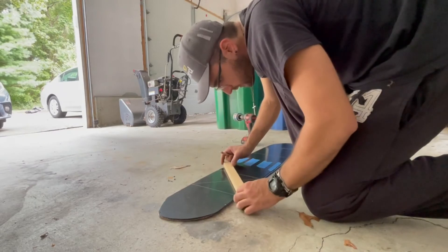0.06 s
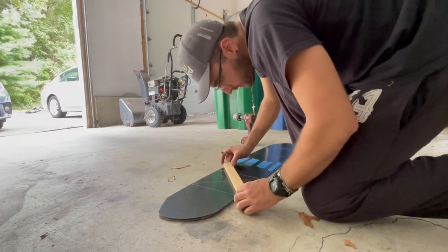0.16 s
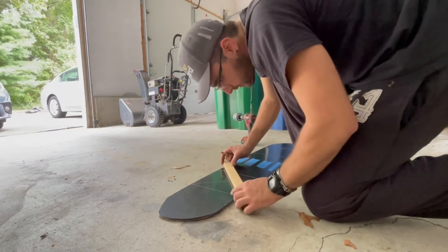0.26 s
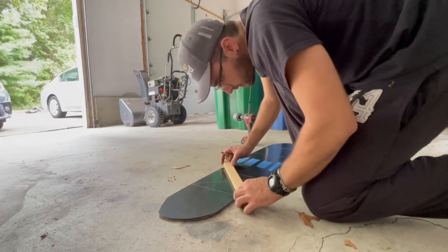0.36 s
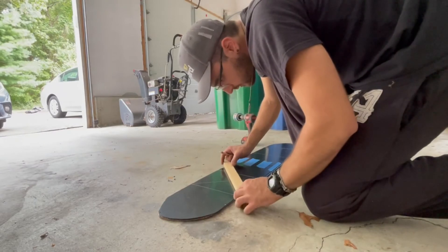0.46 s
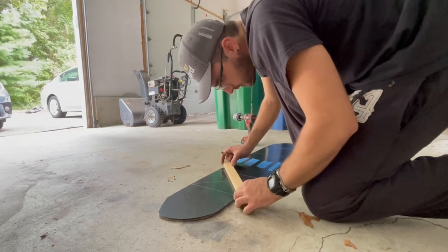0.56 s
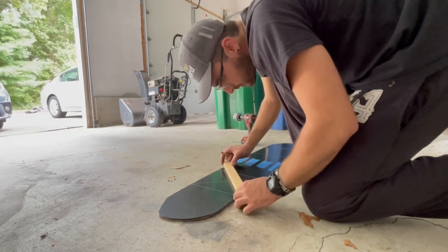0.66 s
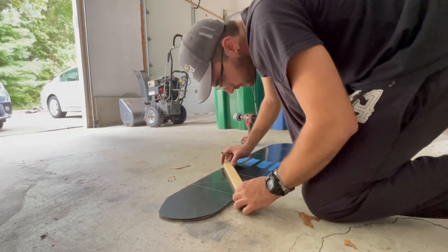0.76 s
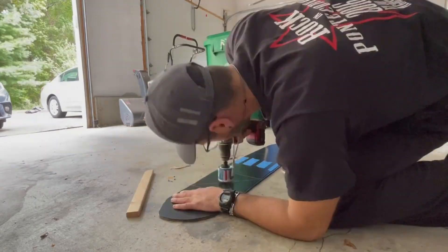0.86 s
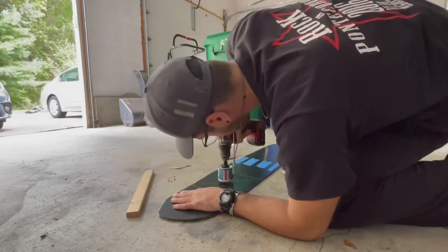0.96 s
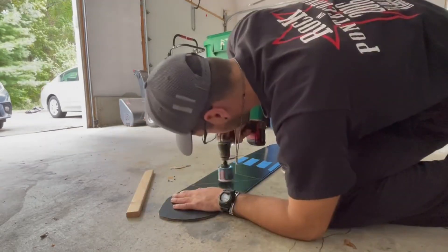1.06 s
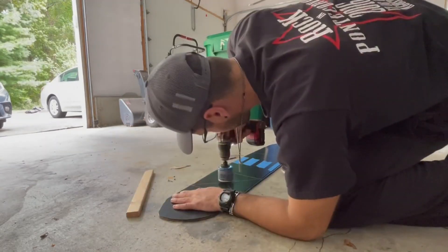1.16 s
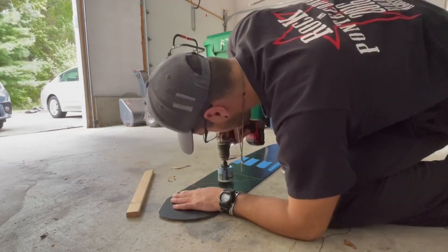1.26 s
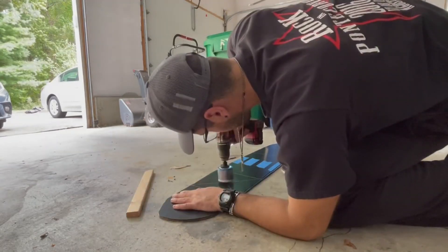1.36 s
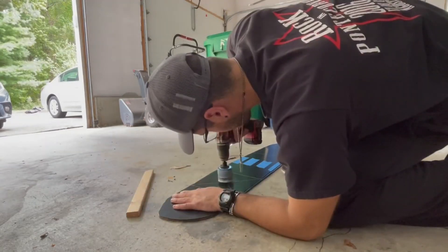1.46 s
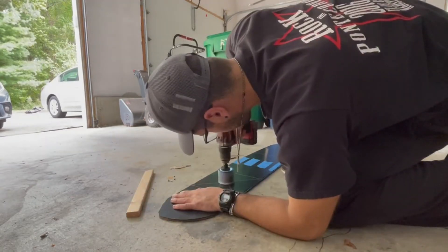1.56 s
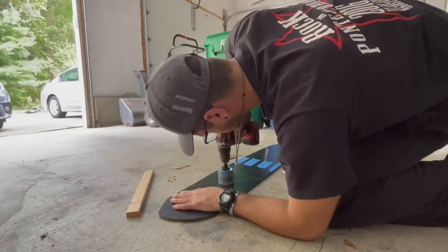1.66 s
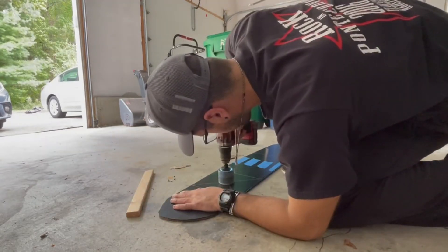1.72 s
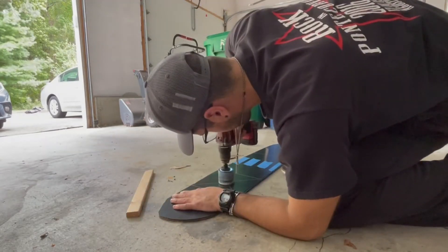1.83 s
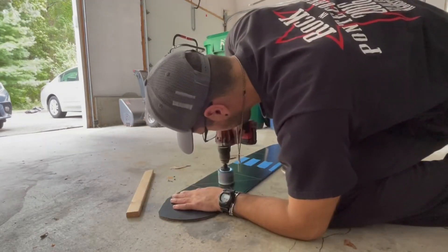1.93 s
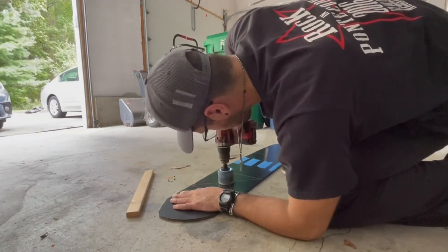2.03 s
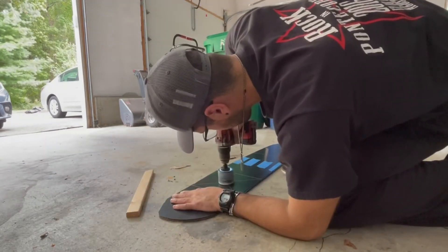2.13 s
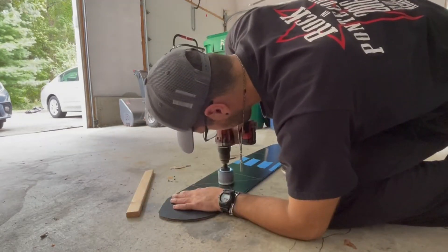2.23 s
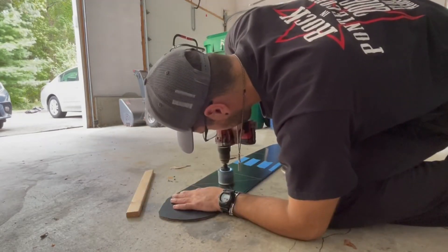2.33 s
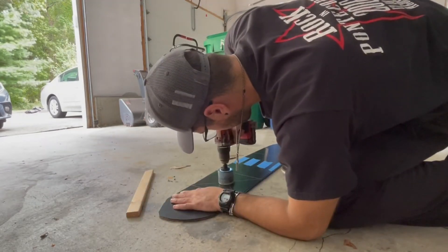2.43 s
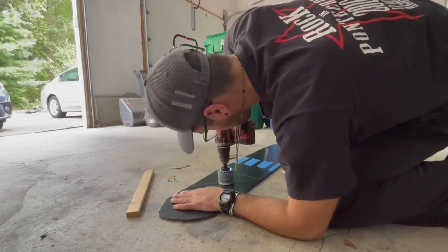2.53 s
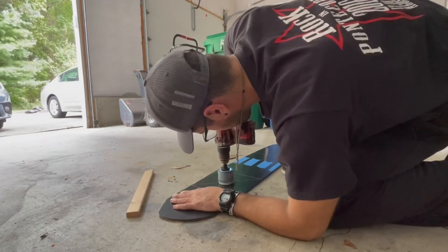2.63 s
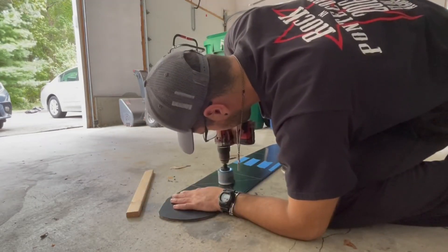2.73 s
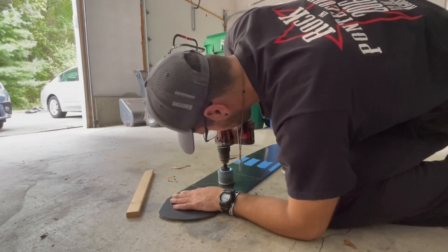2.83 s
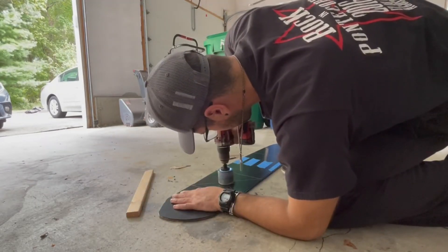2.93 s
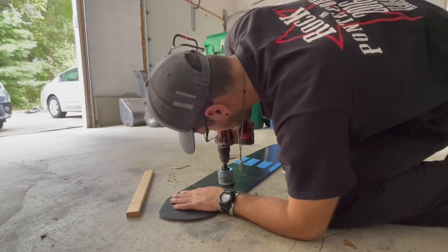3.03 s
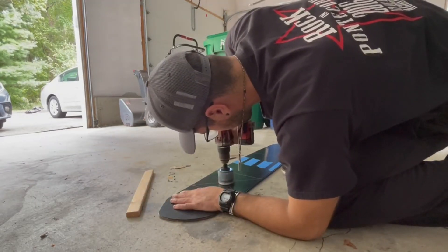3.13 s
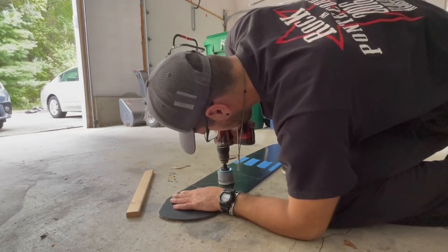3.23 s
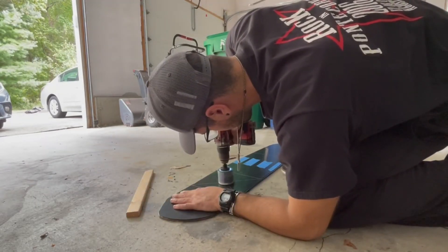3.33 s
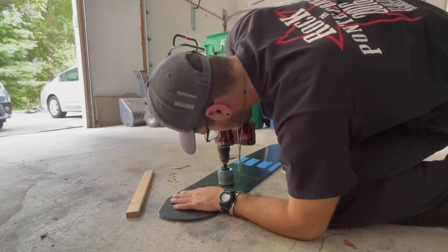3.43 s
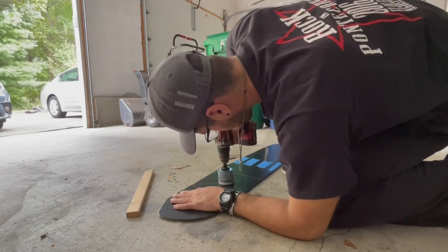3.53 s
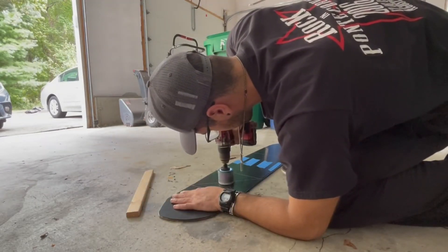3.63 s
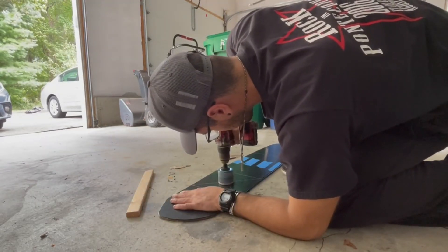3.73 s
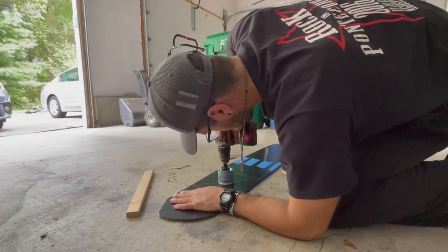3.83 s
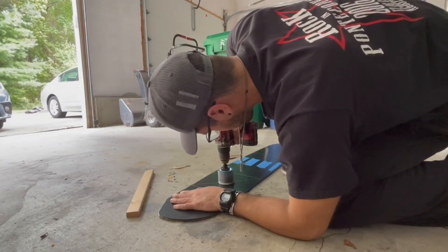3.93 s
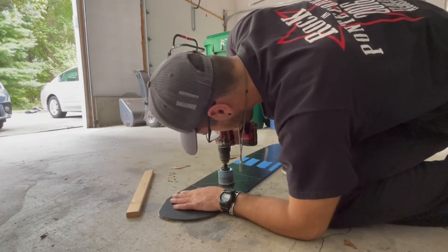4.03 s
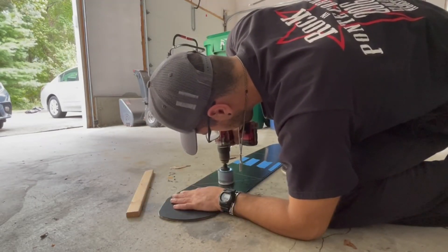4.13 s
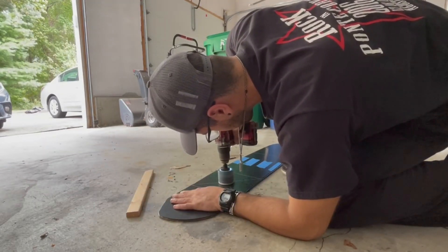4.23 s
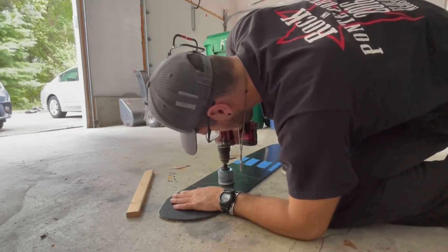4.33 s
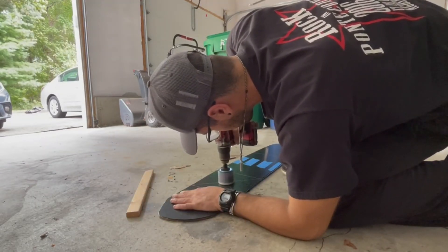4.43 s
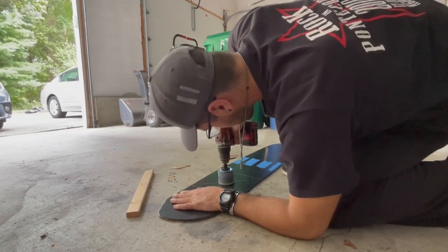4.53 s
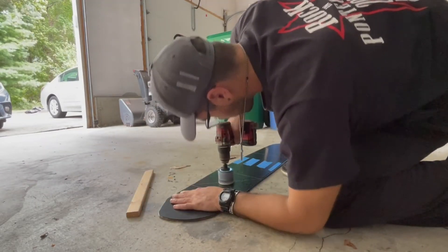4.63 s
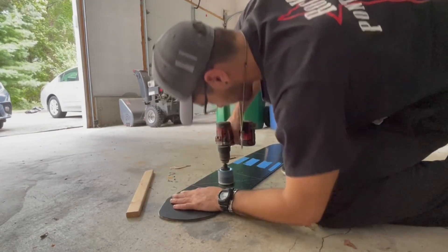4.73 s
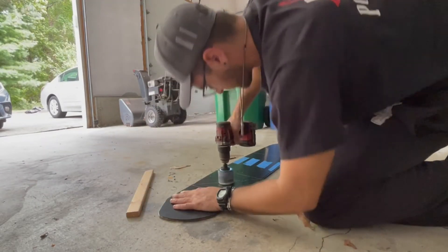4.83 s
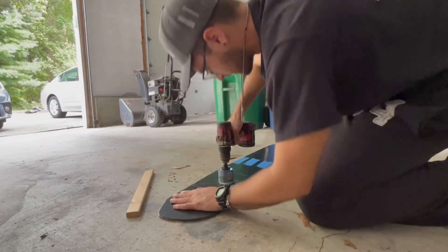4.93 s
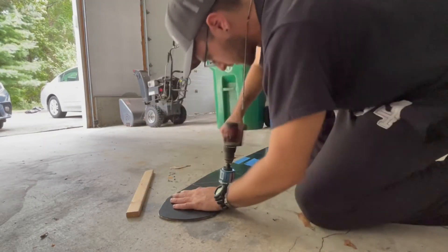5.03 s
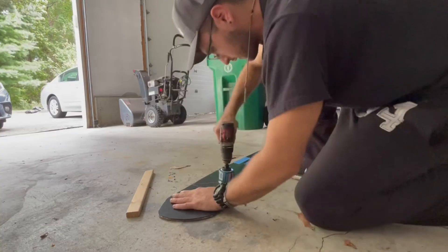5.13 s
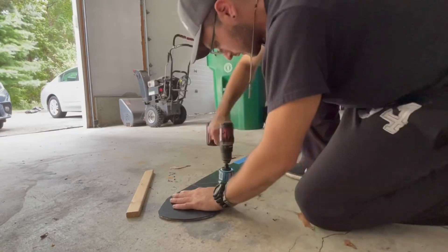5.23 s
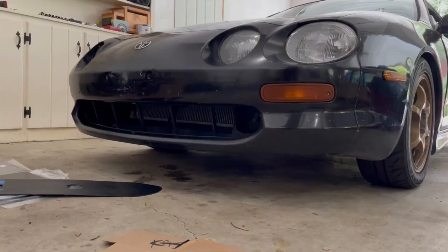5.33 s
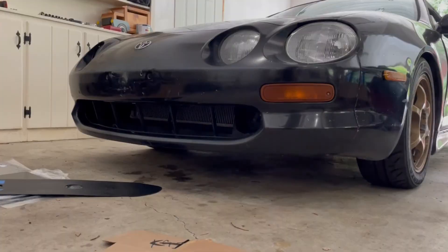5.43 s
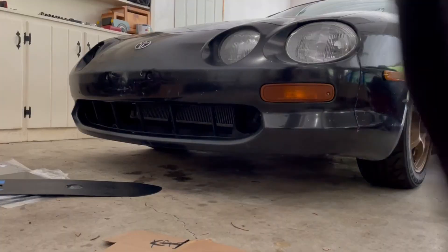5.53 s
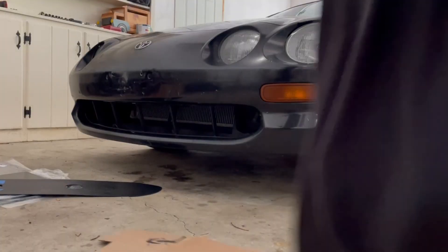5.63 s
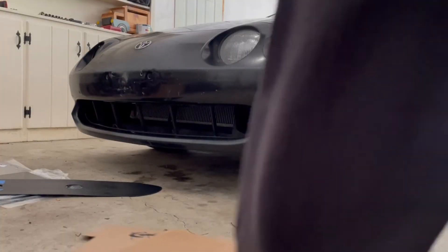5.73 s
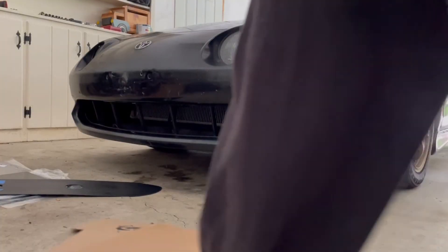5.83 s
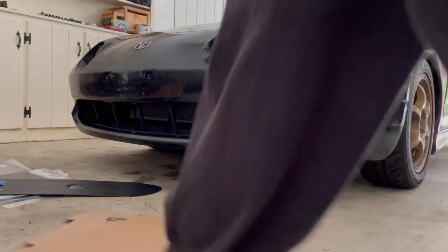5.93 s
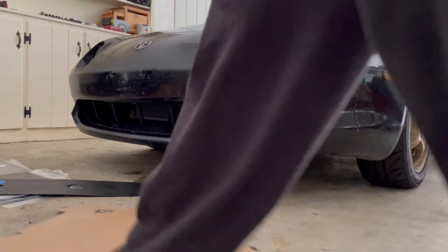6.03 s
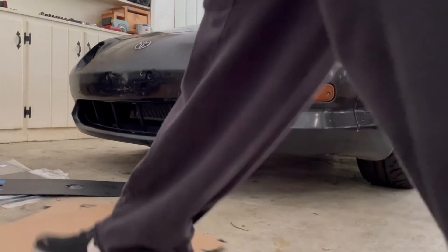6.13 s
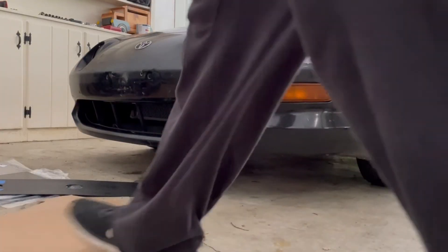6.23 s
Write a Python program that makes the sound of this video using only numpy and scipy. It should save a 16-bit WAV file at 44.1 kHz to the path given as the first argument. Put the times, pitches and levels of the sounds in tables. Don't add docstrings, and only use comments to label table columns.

```python
import sys
import numpy as np
from scipy import signal
from scipy.fft import rfft, irfft, next_fast_len
from scipy.io import wavfile
from scipy.ndimage import uniform_filter1d, map_coordinates

SR = 44100
rng = np.random.default_rng(int(sys.argv[2]) if len(sys.argv) > 2 else 0)


def bounce(signal):
    frames = np.transpose(np.atleast_2d(signal))
    limited = np.clip(frames, -1, 1)
    pcm = np.round(limited * 32767).astype(np.int16)
    wavfile.write(sys.argv[1], SR, pcm)


def gain_from_db(level_db):
    decades = np.asarray(level_db, float) / 20
    return 10 ** decades


N = 276418
SCENE_CHANGES_S, SPIN_UP_ENDS_S, STOPPED_S = 5.343, 1.5, 4.995
SWITCH_HZ = 7772

# t/s, level/dB
RUMBLE_LEVEL = [(0, -61), (.72, -60.5), (.76, -66), (.85, -55.5), (.926, -73), (.95, -64), (5.34, -56.5),
                (5.36, -69), (5.51, -70)]
# t/s, level/dB
ENGINE_LEVEL = [(0, -56), (.15, -58), (.55, -55.5), (.62, -71), (.8, -61), (.88, -58), (.9, -93)]
# f/Hz, level/dB per Hz
HISS_DRILL = [(150, -11), (250, -9.5), (370, -11), (800, -12), (1400, -19.5), (4800, -22.5), (6000, -17),
              (8000, -27.5), (10800, -34), (13500, -36), (15500, -43)]
HISS_CORNER = [(150, -10), (250, -2), (1000, -2.5), (2200, -11), (2330, 1), (2440, -10), (2950, -4),
               (3100, -3), (3300, -8), (4940, -15), (6280, -4), (9000, -50), (11000, -28), (15500, -32)]
RUMBLE_COLOUR = [(15, -59), (25, -49), (45, -5), (135, -8), (199, -17.5), (330, -18.5), (430, -48),
                 (730, -120)]
# t/s, commutation f/Hz
SPEED = [(0.955, 25), (1.08, 95), (1.15, 200), (1.3, 262), (1.415, 405), (1.452, 520), (1.506, 1026),
         (1.55, 1034), (1.63, 1120), (2.75, 940), (3.2, 938), (3.5, 1022), (4.283, 1102), (4.68, 1092),
         (4.861, 1062), (4.92, 880), (4.988, 520), (5.01, 90), (5.2, 45)]
# t/s, drop/Hz, fall/s, recovery/s
CATCHES = [(1.574, 148, .012, .04), (1.71, 90, .065, .045), (1.815, 80, .035, .09), (1.945, 98, .03, .07),
           (2.09, 72, .065, .05), (2.19, 56, .035, .045), (2.33, 64, .04, .06), (2.42, 44, .02, .12),
           (2.5, 36, .06, .045), (2.58, 98, .025, .05), (2.655, 36, .02, .05), (2.75, 46, .04, .04),
           (2.83, 52, .025, .14), (2.985, 62, .03, .06), (3.115, 66, .055, .08), (3.24, 58, .06, .075),
           (3.43, 34, .1, .06), (4.885, 30, .015, .06)]
# t/s, share/0-1
LOAD = [
    (1.4, .3),
    (1.6, 1),
    (3.3, 1),
    (3.55, .15),
    (4.6, .15),
    (4.9, .6),
]
# t/s, level/dB
EFFORT = [(.95, -63), (.99, -47.5), (1.06, -63), (1.1, -47.5), (1.25, -45), (1.31, -41.5), (1.4, -39.5),
          (1.43, -33.5), (1.53, -27), (4.61, -27.5), (4.66, -25.5), (4.85, -25.5), (4.96, -31), (5.01, -38),
          (5.14, -49), (5.21, -46), (5.26, -54), (5.33, -53)]
# f/Hz, level/dB per Hz
GEARBOX = [(1410, -26), (2400, -6), (3150, -8.5), (4140, -3), (4550, -4), (6030, -3), (6620, -5.5),
           (7740, -3.5), (9260, -16.5), (10700, -9), (13200, -17), (14200, -12), (15600, -23)]
# f/Hz, width/Hz, level/dB
CASING = [(2350, 300, -11), (3450, 340, -1), (3800, 300, -1), (4250, 500, -3.5)]
# t/s, level/dB over the motor
PRESS = [(1.1, -4), (1.5, -8.5), (1.53, 3), (1.58, -1.5), (1.63, -2.5), (3.4, 2.5), (4.97, 3.5),
         (5.01, -29), (5.14, -5)]
# f/Hz, width/Hz, level/dB
PANEL = [(950, 260, 0), (1300, 250, -6)]
PANEL_LOW = [(514, 95, -3), (656, 69, 3), (765, 84, 0)]
# t/s, level/dB
LOOSE = [(1.5, -9), (2.4, -8.5), (3.1, -6.5), (3.4, -6), (4, -6.5), (4.61, -6), (4.68, -1), (5, 1)]
# f/Hz, width/Hz, level/dB
GROOVE = [
    [(925, 70, 0)],
    [(860, 80, 0)],
]
# t/s, high song level/dB, low song level/dB
SONGS = [(3.05, -25, -25), (3.2, -1.5, -9), (3.45, -4, -15), (3.55, -11, -5.5), (3.72, -5, -4),
         (3.85, -21, -11), (4.05, -13, -8), (4.15, -9, -4.5), (4.3, -7, -9), (4.4, -12, -18),
         (4.48, -10, -14), (4.6, -26, -29)]
# f/Hz, width/Hz, level/dB
TEETH = [(1565, 403, -1), (2097, 256, 6.5), (2800, 720, -4)]
CUP = [(2150, 170, 0)]
# f/Hz, level/dB per Hz
THRUM = [(18, -52), (30, -20), (150, -0.5), (194, -5.5), (226, -1.5), (258, -3.5), (420, -4), (550, -6.5),
         (920, -120)]
# t/s, level/dB
LEAN = [(1.5, -5), (1.9, -1), (2.2, -2.5), (2.45, 2), (3.1, -0.5), (3.45, 5), (3.8, 2), (4.9, 0),
        (5.1, -0.5), (5.2, -8)]
# t/s, gear whine level/dB, switching whistle level/dB
SING = [(.955, -72, -63), (1, -75, -53.5), (1.08, -61, -60), (1.11, -66, -51), (1.33, -61, -48),
        (1.43, -30.5, -63), (1.485, -34.5, -63), (1.58, -34.5, -53), (2.1, -33, -44.5), (2.75, -35.5, -54),
        (3.12, -33.5, -56), (3.2, -37, -54), (3.42, -36.5, -46), (3.52, -32.5, -72), (4.1, -42.5, -45),
        (4.84, -36, -58), (4.93, -42, -56), (5.22, -53, -49), (5.29, -62, -68.5)]
# f/Hz, level/dB
RADIATES = [(3000, -18), (3250, 0), (4500, 0), (4900, -14), (6900, -14), (7200, -2), (7900, 0), (8400, -7)]
# t/s, peak level/dB, f/Hz, t60/s
KNOCKS = [(.972, -39, 3600, 0.013), (.985, -34, 3360, 0.007), (1.098, -33, 3606, 0.011),
          (3.35, -19, 3490, .03), (3.435, -15, 3500, 0.022), (3.515, -17, 3470, .02),
          (3.595, -19, 3480, 0.019), (4.992, -8.5, 2600, 0.0047), (5.016, -27, 3350, .025),
          (5.038, -28, 3400, .025), (5.062, -29, 3460, .04), (5.09, -35, 3420, .03),
          (5.187, -26, 3500, .012), (5.2, -23, 3400, 0.014), (5.228, -30, 3430, 0.013),
          (5.289, -23, 1830, 0.015), (5.2905, -17.5, 766, 0.0073), (5.321, -31.5, 900, 0.014),
          (5.5675, -17.5, 1140, 0.014), (5.569, -13, 416, 0.01), (5.576, -33, 5000, .004),
          (5.6, -12, 3680, 0.011), (6.166, -24, 12500, .012), (6.17, -33, 10500, .012),
          (6.188, -27, 152, 0.1), (6.222, -31.5, 155, .5), (6.13, -31, 245, 0.28), (1.532, -41, 72.4, 0.35)]
# t/s, peak level/dB, f/Hz, t60/s
BITE = [(1.5325, -12, 1010, 0.0069), (1.533, -5.5, 2600, .002), (1.604, -22, 1210, 0.036),
        (1.81, -22, 1060, 0.027), (1.885, -25, 930, 0.044), (1.88, -19, 1080, 0.027),
        (2.032, -18.5, 1056, 0.025), (2.31, -22.5, 950, .04), (2.42, -20.5, 1110, 0.034),
        (2.455, -24, 975, .04), (2.805, -22.5, 1010, .03)]
# t/s, peak level/dB, f/Hz, t60/s
POPS = [(5.6178, -11, 2000, .003), (5.6295, 0.5, 1500, 0.0049), (5.6335, -3, 3620, 0.0036),
        (5.645, -5, 2800, 0.0054), (5.653, -9, 3500, 0.0033), (5.6578, -3, 3300, .004),
        (5.71, -10, 3000, .003), (5.756, -11, 1300, 0.0037), (5.85, -12, 2500, .004),
        (6.1955, -21, 3400, .005)]
# t/s, level/dB
SHAKE = [(1.5, -86), (2.1, -52), (2.6, -63), (3.45, -47.5), (3.75, -50), (3.9, -40.5), (4.5, -44),
         (4.85, -50.5), (5, -59)]
# order/multiples of the chuck's turn, level/dB
SHAKE_ORDERS = [(2, -17), (3, -24), (4, -3.5), (5, -16), (6, 1.5), (7, -11.5), (8, -3.5), (9, -18),
                (12.5, -6), (19.5, -6)]
# t/s, f/Hz, level/dB
GROAN = [
    (1.95, 155, -50),
    (2.04, 151, -40),
    (2.15, 102.8, -47),
    (2.29, 91.7, -44.5),
    (2.38, 60, -53),
    (2.5, 42, -66),
]
# t/s, level/dB
DRAG = [(5.566, -36.5), (5.588, -36.5), (5.602, -27), (5.65, -27.5), (5.82, -26), (5.855, -23.5),
        (5.89, -24.5), (6.01, -23.5), (6.092, -25), (6.108, -29.5), (6.125, -38), (6.145, -30.5),
        (6.268, -37.5)]
# f/Hz, level/dB per Hz
GRIT = [(700, -15), (1300, 0), (2700, 0.5), (3600, 1), (6000, -3), (8300, -4), (10500, -7), (13000, -12.5),
        (15100, -7), (15500, -25)]
# f/Hz, width/Hz, level/dB
CRUSH = [(2710, 290, 8), (4230, 1600, -15)]
SHEET = [(155, 95, -10.5), (266.6, 45, 4.5), (309, 38, 5), (474, 117, 0), (766, 260, -2.5), (1390, 390, -7)]
# f/Hz, t60/s
GARAGE = [(100, 0.29), (1000, 0.74), (5000, 0.7), (12000, 0.054)]
# f/Hz, phase/rad
LEAD_DRILL = [(0, 0), (340, .4), (2500, 1), (4400, .6), (5300, 1.5), (6000, 3.1), (6500, 5.8), (7900, 6.5),
              (8650, 9.3), (10100, 6.7), (11000, 6.3), (12400, 6), (13200, 4.7), (14100, 3.3),
              (14500, 3.14)]
LEAD_SHEET = [(0, 0), (430, .5), (3000, .5), (4400, 0), (5900, -.2), (6600, -.7), (7700, -3.14),
              (8900, -3.14), (10500, -6.28), (12900, -6.28), (13800, -9.42), (14200, -10.4), (15100, -10.4),
              (15400, -9.42)]
# f/Hz, level/dB
TILT_DRILL = [(60, -2), (110, 1), (200, -0.5), (380, 2.5), (700, 0.5), (1290, 1.1), (2380, 1.3), (4400, 2),
              (8120, -3), (12000, -3.5), (15000, -.5)]
TILT_SHEET = [(60, -5), (110, 3), (200, 1), (380, 1), (700, 5.5), (1290, 3), (2380, 4), (4400, 4.5),
              (8120, 3.5), (15000, -6)]
# f/Hz, level/dB
WET_DRILL = [(60, -30), (150, -7), (400, -3), (3000, -1.5), (6500, -3.5), (7600, -5), (9000, 7.5),
             (10500, -2), (11500, -28)]
WET_SHEET = [(100, -8), (400, -8), (1700, -2.5), (6500, -8.5), (7600, -27), (8800, -6), (9600, -21),
             (10700, -19), (13000, -16), (14500, -13)]


def unit(x):
    return x / np.sqrt(np.mean(x ** 2) + 1e-20)


def along(points, hz):
    f, v = np.transpose(points)
    return np.interp(np.log(hz + 1), np.log(f + 1), v)


def curves(rows):
    s, *cols = np.transpose(rows)
    return [np.interp(np.arange(N) / SR, s, c) for c in cols]


def span(t0, t1):
    return (np.arange(N) >= t0 * SR) & (np.arange(N) < t1 * SR)


def wobble(rate):
    knots = rng.standard_normal(int(N * rate / SR) + 4)
    return map_coordinates(knots, [np.arange(N) * rate / SR])


def filtered(x, response):
    m = next_fast_len(N + SR // 2)
    return irfft(rfft(x, m) * response(np.fft.rfftfreq(m, 1 / SR)), m)[..., :N]


def coloured(x, spectrum):
    return unit(filtered(x, lambda hz: gain_from_db(along(spectrum, hz))))


def resonant(x, modes):
    def body(f):
        total = 0
        for k, (centre, width, db) in enumerate(modes):
            damping = 1.5j * f * width
            total = total + (-1) ** k * gain_from_db(db / 2) * damping / (centre ** 2 - f ** 2 + damping)
        return total
    return unit(filtered(x, lambda f: body(f) ** 2))


def gritty(rough_db, rate):
    return rng.standard_normal(N) * gain_from_db(rough_db * wobble(rate))


def tone(hz, start=None):
    if start is None:
        start = rng.uniform(0, 2 * np.pi)
    return np.sqrt(2) * np.sin(2 * np.pi * np.cumsum(hz * np.ones(N)) / SR + start)


def struck(events):
    out, t = np.zeros(N + SR), np.arange(SR // 6) / SR
    for s, db, hz, t60 in events:
        crack = 0.42 * gain_from_db(-60 * t / 0.0039) * uniform_filter1d(rng.standard_normal(len(t)), size=3)
        ring = gain_from_db(-60 * t / t60) * np.sin(2 * np.pi * hz * t) * (1 - np.exp(-t / 0.00056))
        out[round(s * SR):][:len(t)] += gain_from_db(db) * (ring + crack)
    return out[:N]


def air():
    def two_ports(mix, colour):
        return np.array(mix) @ [coloured(rng.standard_normal(N), colour) for _ in range(2)]

    first = span(0, SCENE_CHANGES_S)
    hiss_mix = [[1.28, 0.8], [0.48, -0.98]]
    hiss = np.where(first, two_ports(hiss_mix, HISS_DRILL), two_ports(hiss_mix, HISS_CORNER))
    hiss = hiss * gain_from_db(np.where(first, -58.5, -64.5) + wobble(11))
    rumble_db = curves(RUMBLE_LEVEL)[0] + 3.5 + 1.4 * wobble(12.0)
    rumble = gain_from_db(rumble_db) * two_ports([[1.0, 0.22], [1.0, -0.3]], RUMBLE_COLOUR)
    orders = [(2, -10), (4, -6), (5, 0), (6, -10)]  # (multiple of the 28.3 Hz idle, dB)
    engine = sum(gain_from_db(db + wobble(8)) * tone(k * 28.3) for k, db in orders)
    return hiss + rumble + gain_from_db(curves(ENGINE_LEVEL)[0]) * engine


def gear_speed():
    t = np.arange(N) / SR
    dips = sum(drop * np.interp(t, [s - fall, s, s + back], [0, 1, 0]) for s, drop, fall, back in CATCHES)
    return curves(SPEED)[0] - dips


def gears(bite):
    fast = np.clip(gear_speed() / 800, 0, 1)
    level_db = curves(EFFORT)[0] - 7.5 + 5.3 * fast + 0.085 * bite + 0.65 * wobble(29.79)
    return gain_from_db(level_db) * coloured(gritty(1.5, 900), GEARBOX)


def casing():
    speed = gear_speed()
    kicks = unit(np.diff(np.floor(np.cumsum(speed / SR)), prepend=0))
    level_db = curves(EFFORT)[0] - 3.5 - 10.8 * np.clip(speed / 800, 0, 1) + wobble(60)
    return gain_from_db(level_db) * resonant(0.4 * kicks + gritty(2.2, 300), CASING)


def panel(bite):
    ring = gain_from_db(0.8 * wobble(45)) * resonant(gritty(2, 250), PANEL)
    ring += gain_from_db(curves(LOOSE)[0]) * resonant(gritty(3.0, 200), PANEL_LOW)
    for song_db, mode in zip(curves(SONGS), GROOVE):
        ring += gain_from_db(song_db + 1.5 * wobble(25)) * resonant(gritty(2.5, 200), mode)
    return ring * gain_from_db(curves(EFFORT)[0] + curves(PRESS)[0] - 8 + 0.5 * bite + 0.6 * wobble(25.47))


def teeth(bite):
    effort_db = curves(EFFORT)[0]
    freed_db = 0.16 * (curves(LOOSE)[0] + 9.5)
    scrape_db = effort_db + curves(PRESS)[0] - 8.5 + freed_db + 0.5 * bite
    scrape = gain_from_db(scrape_db) * resonant(gritty(3.0, 500), TEETH)
    since = np.arange(N) / SR - 1.3
    hum_db = effort_db - 12.5 - 9 * since
    return scrape + gain_from_db(hum_db) * (since > 0) * resonant(gritty(3, 150), CUP)


def floor_thrum():
    pressed_db = np.where(span(0, STOPPED_S), 0.78 * curves(PRESS)[0], 10)
    level_db = curves(EFFORT)[0] + pressed_db - 18.5 + curves(LEAN)[0]
    level_db = level_db + 3.5 * curves(LOAD)[0] + 1.55 * wobble(8.8)
    return gain_from_db(level_db) * coloured(rng.standard_normal(N), THRUM)


def saw():
    bite = wobble(12)
    return (gears(bite) + casing() + panel(bite) + teeth(bite) + floor_thrum()) * span(0.88, 6.5)


def rotor_speed():
    speed = uniform_filter1d(gear_speed(), size=220)
    steady = uniform_filter1d(speed, size=8000)
    loaded = np.clip((np.arange(N) / SR - SPIN_UP_ENDS_S) / 0.12, 0, 1) * curves(LOAD)[0]
    return 0.99 * (speed + loaded * (steady - speed)), steady, loaded


def gear_whine():
    whine_db, load = curves(SING)[0], curves(LOAD)[0]
    speed = uniform_filter1d(gear_speed(), size=220)
    _, steady, loaded = rotor_speed()
    rising = span(0, SPIN_UP_ENDS_S)
    jerk = 1 + 0.004 * load * wobble(80)

    def beads():
        return gain_from_db((2 + 1.4 * load) * wobble(90))

    whine = np.zeros(N)
    for k, db, flutter in [(4, 0, 0.006), (8.17, -2, 0.009)]:  # (order, dB, pitch flutter share)
        level_db = whine_db + db + along(RADIATES, k * speed) - (k - 4) * 1.6 * rising
        whine += gain_from_db(level_db) * beads() * tone(k * speed * jerk * (1 + flutter * wobble(150)))
    for k, db in [(5, -19), (6, -16), (7, -16)]:
        whine += gain_from_db(whine_db + db + along(RADIATES, k * speed)) * rising * beads() * tone(k * speed)
    side_db = whine_db - 13 + along(RADIATES, 4 * speed)
    for share in (0.945, 1.055):
        whine += gain_from_db(side_db) * load * beads() * tone(4 * speed * (share + 0.008 * wobble(60)))
    blurred = beads() * tone(2.05 * steady * (1 + 0.04 * wobble(500)))
    return whine + gain_from_db(whine_db - 5) * loaded * np.clip((steady - 880) / 170, 0, 1) * blurred


def switching_whistle():
    rotor = rotor_speed()[0]
    speed = uniform_filter1d(gear_speed(), size=220)
    slow_db = -14 * np.clip(speed / 600, 0, 1)

    def pair(order):
        return tone(SWITCH_HZ + order * rotor, start=0) + tone(SWITCH_HZ - order * rotor)

    whistle = pair(1)
    upper = 0.48 * np.clip(speed / 900, 0, 1)
    whistle = whistle + upper * tone(SWITCH_HZ + rotor, start=0)
    braking = 7 * span(4.89, STOPPED_S)
    whistle = whistle + braking * tone(SWITCH_HZ + rotor, start=0)
    whistle = whistle + gain_from_db(slow_db) * (gain_from_db(1) * tone(SWITCH_HZ) + gain_from_db(-4) * pair(2))
    octave = tone(2 * SWITCH_HZ + rotor) + 0.64 * tone(2 * SWITCH_HZ)
    whistle = whistle + gain_from_db(-8.0 + 1.87 * slow_db - 40 * span(1.32, 5.6)) * octave
    whistle = whistle + gain_from_db(-7 - 30 * span(5.25, 6)) * tone(2 * SWITCH_HZ - rotor)
    level_db = curves(SING)[1] + 1.5 * wobble(9) + wobble(30)
    return gain_from_db(level_db) * span(0.958, SCENE_CHANGES_S) * whistle


def knocks():
    return struck(KNOCKS + BITE + POPS)


def chuck_turn_hz():
    return uniform_filter1d(gear_speed(), size=9000) / 39.1


def chuck_shake():
    turn_hz = chuck_turn_hz()
    shake = sum(gain_from_db(db + 0.24 * wobble(2.4)) * tone(k * turn_hz) for k, db in SHAKE_ORDERS)
    return gain_from_db(curves(SHAKE)[0]) * shake


def panel_groan():
    hz, db = curves(GROAN)
    sagging = span(GROAN[0][0], GROAN[-1][0])
    return gain_from_db(db + 2.5 * wobble(25)) * sagging * tone(hz * (1 + 0.2 * wobble(45)))


def loose_jaw():
    from_s, to_s = 3.268, 4.23
    turns = np.cumsum(chuck_turn_hz() * span(from_s, to_s)) / SR
    times = np.flatnonzero(np.diff(np.ceil(turns))) / SR
    weak = (np.arange(len(times)) % 2 == 0) * (times - from_s)
    levels_db = -19 + 3 * rng.uniform(-0.88, 1, len(times)) - 15 * weak
    return struck([(s, db, 10300, 0.012) for s, db in zip(times, levels_db)])


def drag():
    sheet_db, since = curves(DRAG)[0], np.arange(N) / SR - 5.625
    shove = np.exp(-np.abs(since) / np.where(since > 0, 0.15, 0.025))
    crush = gain_from_db(-33) * shove ** 2 * resonant(gritty(4, 700), CRUSH)
    slip = wobble(60)
    grit_db = sheet_db - 1.0 + 10.5 * shove + 1.2 * slip
    grit = gain_from_db(grit_db) * coloured(gritty(1.1, 900), GRIT)
    sheet = gain_from_db(sheet_db - 3.0 + 0.28 * slip) * resonant(gritty(0.59, 300), SHEET)
    return (grit + crush + sheet) * span(5.57, 7)


def echoes(x, count=3):
    out, step = np.zeros((2, N)), np.arange(N) / SR / 0.25
    for k in range(count):
        hz, t, z = signal.stft(rng.standard_normal((2, SR // 2)), SR, nperseg=256)
        fade = gain_from_db(-60 * t / along(GARAGE, hz)[:, None])
        fade = fade / np.linalg.norm(fade, axis=1)[:, None]
        tail = signal.istft(z * fade, SR, nperseg=256)[1]
        away = np.clip((step - k) % count - count / 2, -1, 1)
        piece = np.pad(x * np.cos(np.pi / 2 * away), (300, 0))
        out += signal.fftconvolve(piece[None], tail / np.linalg.norm(tail[0]), axes=1)[:, :N]
    return out


def heard(body, near, lead, tilt, wet):
    side = np.array([[0.5], [-0.5]])
    direct = filtered(body + near, lambda hz: np.exp(1j * side * np.interp(hz, *np.transpose(lead))))
    echo = filtered(echoes(body + gain_from_db(-9) * near), lambda hz: gain_from_db(along(wet, hz)))
    return filtered(direct + echo, lambda hz: gain_from_db(side * along(tilt, hz)))


def scene():
    first = span(0, SCENE_CHANGES_S)
    outdoors = air()
    drilling, whistle, blows = saw(), switching_whistle(), knocks()
    near = gear_whine() + gain_from_db(3.0) * whistle + blows + chuck_shake() + panel_groan() + loose_jaw()
    drill = heard(drilling, near, LEAD_DRILL, TILT_DRILL, WET_DRILL) * first
    drill += whistle * gain_from_db([[-10.5], [-5.5]])
    crawling = span(0, 1.32) | span(4.99, 5.25)
    drill += gain_from_db(-1) * filtered(whistle * crawling, lambda hz: hz > 15000)
    sheet = heard(drag(), blows * ~first, LEAD_SHEET, TILT_SHEET, WET_SHEET)
    return drill + sheet + outdoors


def band_limit(x):
    return signal.sosfilt(signal.butter(12, 15780, fs=SR, output="sos"), x)


def record(dry):
    mix = filtered(dry, lambda hz: 1 / (1 + (31 / (hz + 1)) ** 4))
    return band_limit(mix)


dry = scene()
out = record(dry)
bounce(out)
```